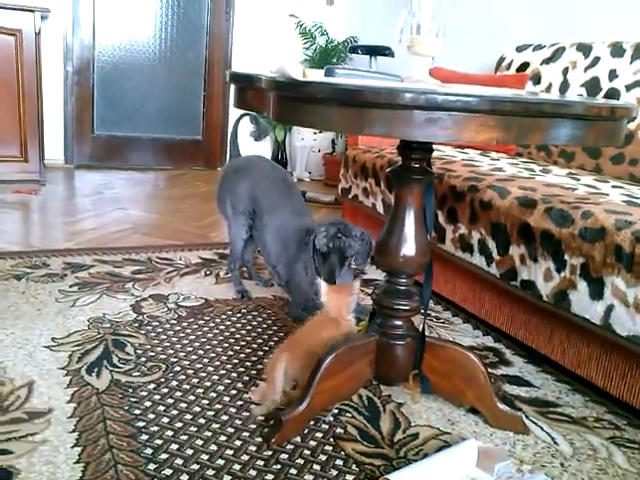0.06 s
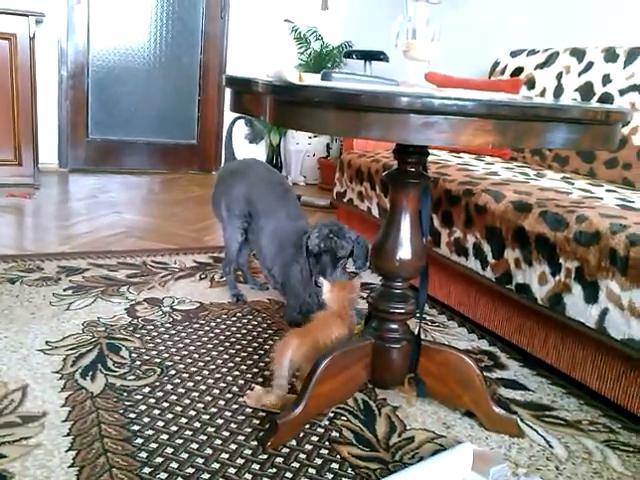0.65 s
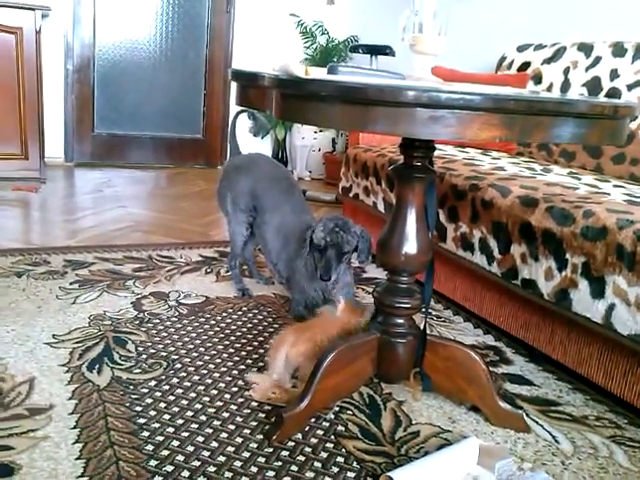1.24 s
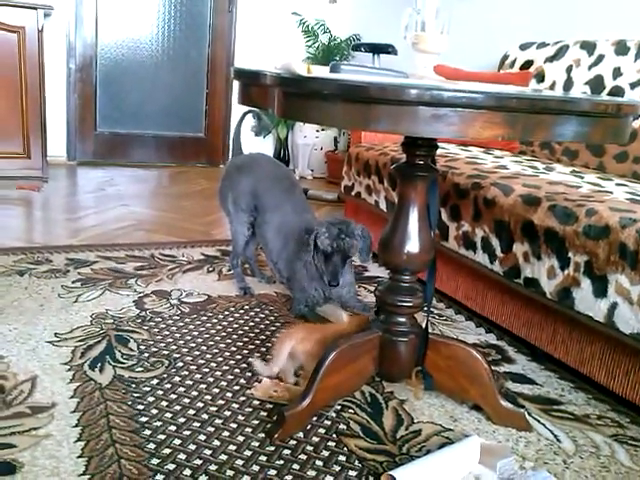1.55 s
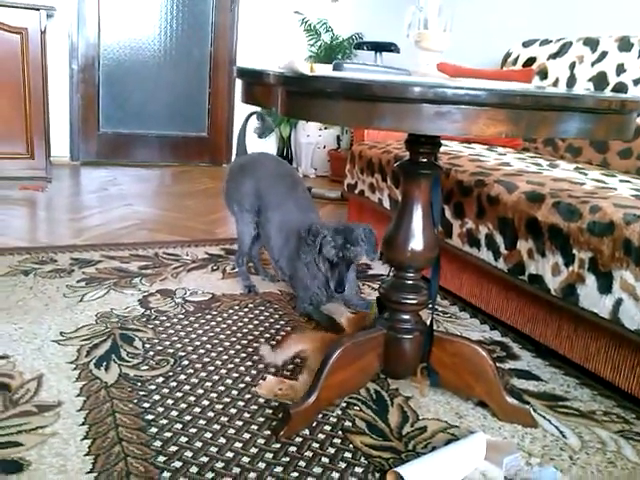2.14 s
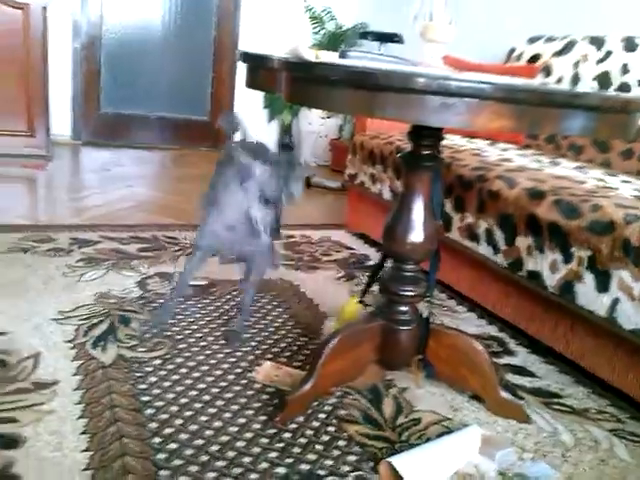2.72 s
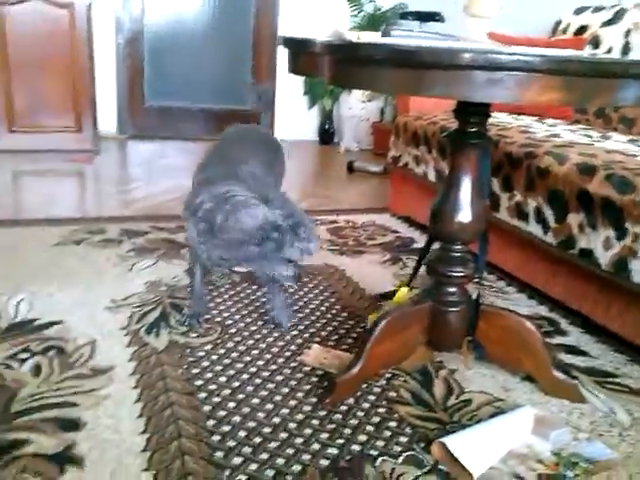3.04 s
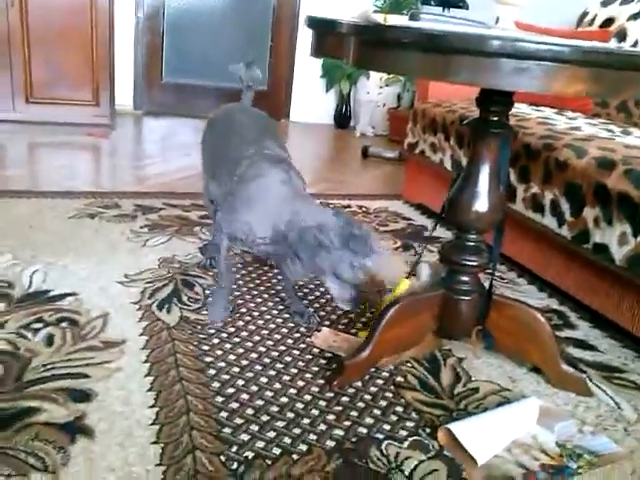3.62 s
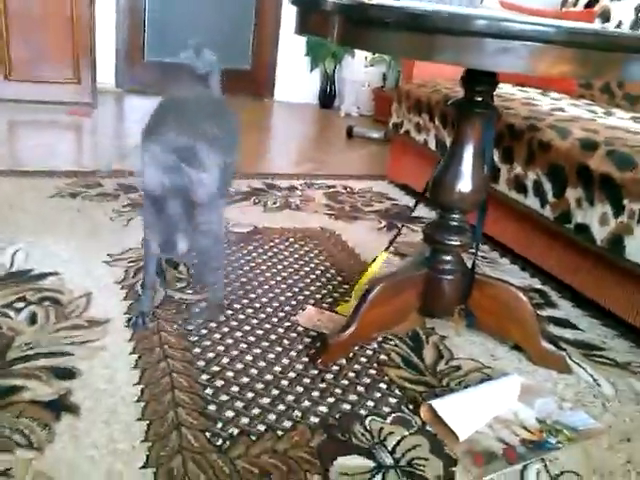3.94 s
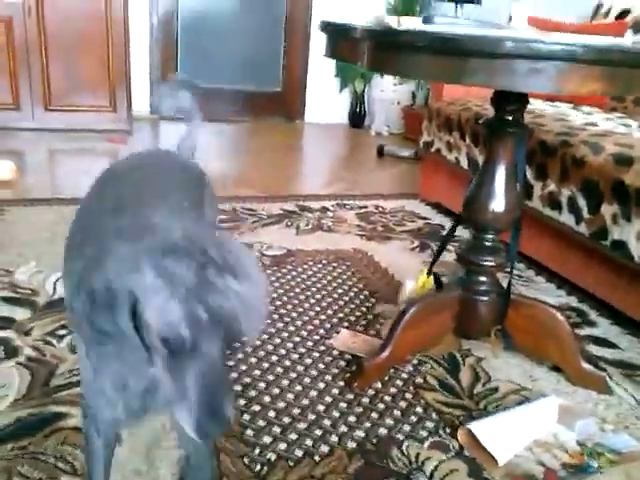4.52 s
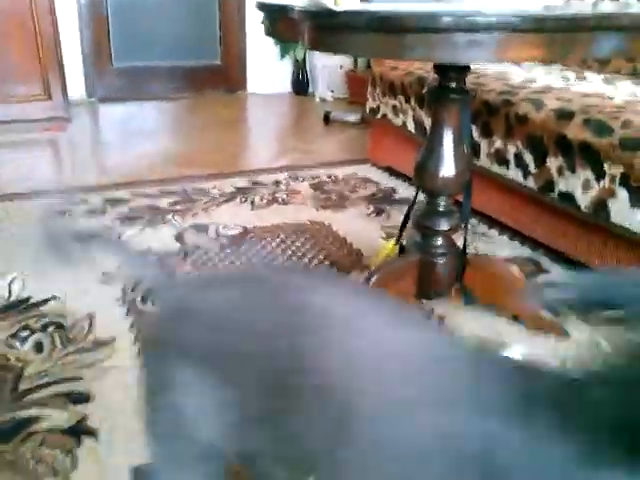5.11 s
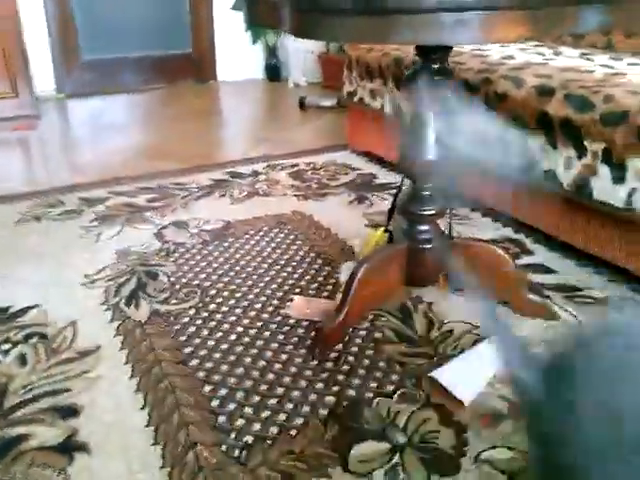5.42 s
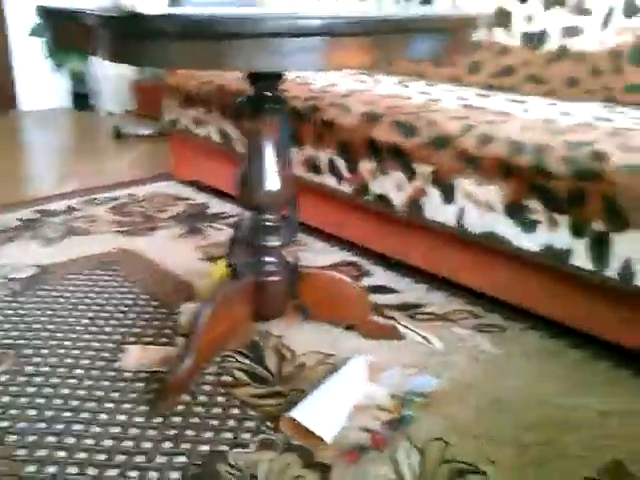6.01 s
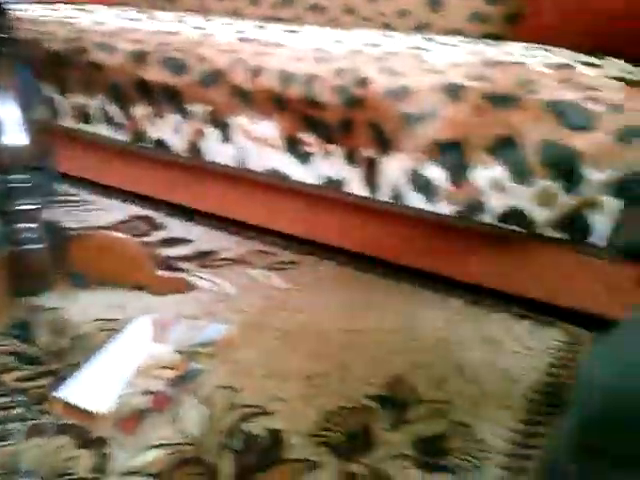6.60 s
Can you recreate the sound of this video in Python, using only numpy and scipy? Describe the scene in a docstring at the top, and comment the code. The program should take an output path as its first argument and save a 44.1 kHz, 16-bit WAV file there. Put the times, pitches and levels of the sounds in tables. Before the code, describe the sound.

For the first two seconds there is only quiet room noise, with a few faint ticks and slight stirrings of air, while a dog and a kitten tussle almost silently on a rug. From about 2.2 seconds, scratchy, hissing strokes build, like fingers shifting on a phone right by the microphone. Around 2.8 seconds a short cluster of low air thumps hits the microphone as the dog jumps back. The hiss is strongest near 3.3 seconds, followed by a sharp click. Soft, dull paw steps come now and then until about 5.6 seconds. More scratches and ticks fall around 4 seconds, with a quick group of soft knocks and clicks at 4.4. After 4.5 seconds the hiss dulls to a rustling scrape. Short scuffs come from 5 seconds on, with another click and knock near 6.3, then the rubbing fades. Everything is close and dry.

```python
"""A dog and a kitten tussle almost silently on a rug in a quiet room, close to a hand-held phone.
At first there is only room noise, with faint ticks and stirrings of air. After two seconds come scratchy
strokes, probably fingers shifting on the case, that hiss in the microphone port. Near three seconds air
thumps on the microphone as the dog jumps back. Then paws pad about, sharp ticks and soft knocks fall
between the strokes, the hiss dulls as the phone swings round, and a few short scuffs come last."""
import sys
import numpy as np
from scipy import signal
from scipy.fft import rfft, irfft, next_fast_len
from scipy.io import wavfile
from scipy.ndimage import uniform_filter1d, map_coordinates

SR = 44100
rng = np.random.default_rng(int(sys.argv[2]) if len(sys.argv) > 2 else 0)


def wav_out(sig):
    """Save sig, one row per channel (or a flat mono array), as 16-bit PCM at SR to the path in sys.argv[1]."""
    wavfile.write(sys.argv[1], SR, np.round(np.clip(np.atleast_2d(sig).T, -1, 1) * 32767).astype(np.int16))


N = 298116
T = np.arange(N) / SR


def amp(db):
    """Amplitude ratio of a level in decibels."""
    return 10 ** (np.asarray(db) / 20)


def unit(x):
    """Normalisation to rms 1."""
    return x / np.sqrt(np.mean(x ** 2) + 1e-20)


def wobble(knots_per_s):
    """Slow random modulation: a spline through Gaussian values."""
    return map_coordinates(rng.standard_normal(int(N * knots_per_s / SR) + 4), [T * knots_per_s])


def filtered(x, response):
    """Linear filtering: the spectrum of x times a frequency response."""
    size = next_fast_len(len(x) + 8192)
    return irfft(rfft(x, size) * response(np.fft.rfftfreq(size, 1 / SR)), size)[:len(x)]


def coloured(x, spectrum):
    """Spectral shaping by (frequency_hz, gain_db) points, at rms 1."""
    points_hz, gain_db = np.transpose(spectrum)
    return unit(filtered(x, lambda f: amp(np.interp(np.log(f + 1), np.log(points_hz), gain_db))))


def resonance(f, centre_hz, width_hz):
    """Frequency response of a damped oscillator."""
    return 1j * f * width_hz / (centre_hz ** 2 - f ** 2 + 1j * f * width_hz)


def noise_band(centre_hz, width_hz, stages=2, samples=N):
    """Random excitation of equal resonators in series, at rms 1."""
    noise = rng.standard_normal(samples)
    return unit(filtered(noise, lambda f: resonance(f, centre_hz, width_hz) ** stages))


def swell(full_s, rise_s, hold_s, fall_s):
    """Near-exponential growth and decay about a plateau that begins at full_s."""
    depth_db = 18.5  # one rise time before the plateau, or one fall time after it
    before = np.maximum(full_s - T, 0) / rise_s
    after = np.maximum(T - full_s - hold_s, 0) / fall_s
    return np.where(before + after < 4, amp(-depth_db * (before ** 0.94 + after ** 0.93)), 0)


def add(track, start_s, sound):
    """Superposition of a sound on the track."""
    i = max(round(start_s * SR), 0)
    track[i:i + len(sound)] += sound[:N - i]


def room():
    """Broadband noise with resonant bands: a low drone, port hiss and a midrange that fades in."""
    # spectrum of the quiet room: frequency_hz, gain_db
    ambient = [(20, -3.5), (76, -11.5), (140, -11.5), (200, -5.5), (290, 0), (450, -6), (750, -9.5),
               (1400, -13.5), (2200, -20), (2900, -26), (5000, -29), (7500, -28), (12500, -30.5),
               (16000, -28.5)]
    wash = amp(-53.5 + 1.28 * wobble(4.816)) * coloured(rng.standard_normal(N), ambient)
    drone = amp(-62.5) * noise_band(centre_hz=283.5, width_hz=66)
    port = amp(-66.5) * noise_band(centre_hz=9020, width_hz=1200)
    midrange_db = np.interp(T, [2.2, 3.6], [-80, -63])
    midrange = amp(midrange_db) * noise_band(centre_hz=1870, width_hz=1200, stages=3)
    return wash + drone + port + midrange


def air():
    """Turbulence rumbles on the port; each puff is a pressure peak between two shallow troughs."""
    # gusts of stirred air: full_s, rise_s, hold_s, fall_s, level_db
    gusts = [(0.198, .2, 0.55, 0.64, -59), (1.023, 0.044, 0.26, 0.7, -62.5),
             (2.258, 0.09, 0.043, 0.16, -47), (2.47, 0.052, 0.24, .1, -45),
             (2.803, 0.068, 0.13, 0.05, -38.5), (3.033, .03, .12, 0.61, -53)]
    # spectrum of the turbulence: frequency_hz, gain_db
    rumble = [(15, 6), (30, 1.5), (50, 1.5), (105, 1.5), (185, -9.5), (300, -17.5), (600, -73), (1500, -85)]
    # puffs on the port: peak_s, peak_db, pitch_hz
    puffs = [(0.595, -39, 80), (1.036, -51, 70), (1.23, -50, 70), (2.268, -51, 93.4), (2.701, -35.5, 69.4),
             (2.801, -28, 104), (2.812, -20.5, 125), (2.843, -21.5, 75), (2.87, -30.5, 173),
             (2.908, -26.5, 90), (2.924, -23.5, 86), (3.051, -30, 73.6), (3.162, -37, 110)]
    strength = sum(amp(level_db) * swell(*timing) for *timing, level_db in gusts)
    flutter = amp(5.5 * wobble(knots_per_s=14))
    out = strength * flutter * coloured(rng.standard_normal(N), rumble)
    for peak_s, peak_db, pitch_hz in puffs:
        phase = 2 * np.pi * pitch_hz * (T - peak_s)
        out += amp(peak_db) * (1 - phase ** 2 / 2) / (1 + phase ** 2 / 2) ** 2
    return out


def ticks():
    """Impulse response: a snap briefly excites high modes and a body mode, then trails off in crackle."""
    # sharp snaps, levels relative: start_s, level_db, ring_hz, body_hz, body_db, crackle_db
    snaps = [ (0.104, -39, 12900, 4500, -6, -1), (0.446, -43.5, 12500, 4540, -2.5, -3),
             (0.7966, -33.5, 7150, 3300, -20, -17), (2.026, -26.5, 11900, 5600, -9, -20),
             (2.1525, -26, 11600, 5240, -10, -13), (2.2334, -39.5, 12000, 3300, -13, -13),
             (3.3664, -9, 8800, 3300, -30, -36), (3.6542, -35.5, 9290, 3500, -13, -7),
             (3.903, -30.5, 8810, 3500, -11, -9), (3.9802, -16, 10000, 3550, -21, 5),
             (4.1296, -33.5, 9010, 3500, -12, -2), (4.3793, -18, 8900, 2500, -15.5, -22),
             (4.3872, -29, 10500, 2000, -2, -14), (4.4092, -22, 8500, 2500, -14, -3),
             (4.58, -22.5, 7700, 6840, -32, -34), (4.5898, -16, 7000, 1860, -18, -24),
             (4.602, -40, 7500, 3000, -5, -9), (4.6322, -24.5, 9600, 6500, -15, 8),
             (5.1388, -29.5, 8900, 3040, 7, -18), (5.285, -51, 8970, 2860, 8.5, -15),
             (5.3613, -29, 8800, 4000, -15, -30), (5.5831, -30.5, 8710, 3600, 0.5, -3),
             (5.9604, -25.5, 9400, 4020, -2.5, 5), (6.0714, -21, 10200, 3240, -5, 3),
             (6.2636, -12, 9400, 3000, -13, -12), (6.4497, -41, 9220, 2840, 5, 8), ]
    # faint ticks of one timbre at random moments while the grip shifts; same columns
    strays = [(rng.uniform(3.7, 6.4), rng.uniform(-48, -42), 9000, 3500, -5, -12) for _ in range(24)]
    out, t = np.zeros(N), np.arange(4096) / SR
    for start_s, level_db, ring_hz, body_hz, body_db, crackle_db in snaps + strays:
        decay = amp(-60 * t / 0.0083) + amp(-24 - 60 * t / 0.21)  # a fast burst and a faint tail
        snap = (t == 0) + amp(crackle_db) * decay * rng.standard_normal(len(t))

        def ring_response(f):
            """Two modes in parallel, band-limited on both sides."""
            modes = resonance(f, ring_hz, 1500) + 1.5 * resonance(f, 9050, 780)
            highpass = (1j * f / (4600 + 1j * f)) ** 2
            return modes * highpass / (1 + (f / (1.68 * ring_hz)) ** 10)

        ring = unit(filtered(snap, ring_response))
        body = unit(filtered(snap, lambda f: -resonance(f, body_hz, 1700) * resonance(f, 2000, 6000)))
        add(out, start_s, amp(level_db - 26) * ring + amp(level_db + body_db - 24) * body)
    return out


def wandering_contact(x, depth_db):
    """Mode excitation depends on position: as the contact wanders, resonances come and go."""
    spectrogram = signal.stft(x, nperseg=512)[2]
    patches = uniform_filter1d(rng.standard_normal(spectrogram.shape), 6, axis=0)  # across frequency
    patches = uniform_filter1d(patches, 12, axis=1)  # across time
    return signal.istft(spectrogram * amp(depth_db * unit(patches)), nperseg=512)[1][:N]


def friction(spectrum, slips_per_s, grain_db, flutter_db):
    """Stick-slip friction: tiny uneven slips on a bed of noise, with a fluttering contact; rms 1."""
    slips = (rng.random(N) < slips_per_s / SR) * rng.standard_normal(N)
    grains = rng.standard_normal(N) + amp(grain_db) * unit(slips)
    grains *= amp(flutter_db * wobble(knots_per_s=130))
    return coloured(wandering_contact(grains, depth_db=1.17), spectrum)


def strokes():
    """Sliding friction on the case: light contact hisses near the port's resonance, firm contact scrapes."""
    # slides over the case: full_s, rise_s, hold_s, fall_s, level_db, pressure (0 to 1)
    slides = [ (0.799, 0.0026, 0.0041, 0.0058, -52, 0.75), (1.379, 0.014, 0.015, .04, -57, 0.8),
              (2.231, .002, 0.01, 0.039, -56, 0.65), (2.407, 0.1, 0.045, 0.032, -50.5, 0.09),
              (2.582, 0.33, 0.073, 0.23, -44.5, 0.73), (2.829, 0.11, 0.05, 0.026, -42, 0.09),
              (3.0, 0.053, 0.023, 0.028, -42, 0.12), (3.06, 0.024, 0.0093, 0.012, -47.5, 0.22),
              (3.197, 0.11, 0.061, 0.049, -38, 0), (3.281, 0.08, 0.025, 0.016, -28, 0.36),
              (3.395, 0.013, 0.054, 0.13, -33, 0.52), (3.49, 0.056, 0.15, 0.006, -42, 0.56),
              (3.668, 0.022, 0.016, 0.21, -51, 0.82), (3.812, 0.021, 0.029, 0.037, -35, 0.6),
              (3.905, 0.0033, 0.0053, 0.0053, -41.5, 0.7), (3.933, .01, 0.046, 0.022, -55.5, 0.91),
              (3.98, .002, 0.022, 0.078, -31.5, 0.46), (4.203, 0.08, .03, .05, -45.5, 0.78),
              (4.255, 0.05, 0.028, 0.041, -33.5, 0.53), (4.406, 0.022, .04, 0.41, -58, 0.77),
              (4.73, .005, 0.0089, 0.15, -57, 0.87), (4.991, 0.17, 0.047, 0.26, -44.5, 0.93),
              (5.043, 0.0081, 0.0052, 0.019, -35.5, 0.7), (5.162, .02, 0.026, 0.081, -53, 0.84),
              (5.37, 0.12, 0.022, 0.062, -44.5, 0.81), (5.437, .012, .01, 0.1, -46.5, 0.64),
              (5.541, 0.014, 0.016, 0.032, -40, 0.82), (5.58, 0.0054, 0.032, 0.34, -43.5, 1),
              (5.775, .12, 0.14, 0.24, -49.5, 0.91), (6.073, 0.0045, 0.017, 0.089, -40.5, 0.66),
              (6.13, 0.12, 0.12, .1, -48, 1), (6.262, .06, 0.009, 0.041, -32.5, 0.84),
              (6.284, .03, .01, 0.15, -38, 0.78), (6.58, 0.029, 0.026, 0.64, -53, 0.83), ]
    # spectra of the four kinds of contact: frequency_hz, gain_db
    hiss_spectrum = [(1500, -60), (3000, -24), (4800, -20.5), (5800, -13.5), (6700, -7.5), (7900, -8),
                     (8700, -4), (9300, 3), (10200, -6.5), (11500, -12.5), (16000, -44)]
    rustle_spectrum = [(1500, -24), (3200, -36.5), (4400, -23.5), (5400, -33.5), (6500, -5.5), (7600, 0),
                       (8500, 3.5), (9300, 6.5), (10200, -2), (12000, -14), (16000, -52)]
    skim_spectrum = [(5000, -23), (6500, -14.5), (8500, -9), (10300, -1), (11500, 3.5), (13200, 0.5),
                     (14500, -1.5), (16000, -10)]
    scrape_spectrum = [(100, -2.5), (300, -9.5), (600, -0.5), (1300, -2), (2300, -1), (3300, -1),
                       (4500, -0.5), (5300, -6.5), (7500, -11.5)]
    swing_s = 4.5  # the phone swings round and the hiss becomes a duller rustle
    power = np.zeros((3, N))
    for *timing, level_db, pressure in slides:
        skim_db, scrape_db = 8 - 27.5 * pressure, -27.5 + 28.5 * pressure
        mix = amp([[0], [skim_db], [scrape_db]])
        power += (amp(level_db) * mix * swell(*timing)) ** 2  # incoherent sources add in power
    uneven_speed = amp(-0.3 * wobble(knots_per_s=38))
    hiss_gain, skim_gain, scrape_gain = np.sqrt(power) * uneven_speed
    hiss = amp(1) * friction(hiss_spectrum, slips_per_s=1900, grain_db=-1.5, flutter_db=1.7)
    rustle = friction(rustle_spectrum, slips_per_s=1500, grain_db=-4, flutter_db=1.5)
    skim = amp(-0.8) * friction(skim_spectrum, slips_per_s=2800, grain_db=-7, flutter_db=1)
    scrape = amp(-1.25) * friction(scrape_spectrum, slips_per_s=300, grain_db=-5.5, flutter_db=-1.4)
    return hiss_gain * np.where(T < swing_s, hiss, rustle) + skim_gain * skim + scrape_gain * scrape


def knocks():
    """Heavily damped oscillation: a soft contact pushes the case out and back for about one cycle."""
    # soft impacts on the case: start_s, peak_db, nominal_pitch_hz
    impacts = [(2.1543, -34.5, 1500), (3.654, -34.5, 460), (3.904, -32.5, 450), (4.3801, -21, 490),
               (4.387, -24, 430), (4.4103, -25, 460), (6.2639, -23.5, 348), (6.2667, -28, 380)]
    out, t = np.zeros(N), np.arange(2048) / SR
    for start_s, peak_db, nominal_pitch_hz in impacts:
        cycles = nominal_pitch_hz * t
        phase = 2 * np.pi * 1.28 * np.log1p(cycles / 0.97)  # the swing slows as the contact yields
        push = np.sin(phase) * cycles * np.exp(-cycles / 0.3)
        add(out, start_s, amp(peak_db) * push / np.abs(push).max())
    return signal.sosfilt(signal.butter(2, 70, "highpass", fs=SR, output="sos"), out)


def paws():
    """Friction between soft surfaces is mostly low in frequency: pads patter dully on the rug."""
    # footfalls: full_s, rise_s, hold_s, fall_s, level_db
    steps = [(2.793, 0.037, 0.088, .04, -47.5), (3.975, 0.049, 0.029, 0.053, -46),
             (4.113, 0.028, 0.052, 0.088, -51.5), (4.55, 0.0087, 0.0071, .05, -48.5),
             (5.149, .02, 0.058, 0.083, -54.5), (5.541, .05, 0.021, 0.083, -48.5)]
    # spectrum of a pad on the rug: frequency_hz, gain_db
    pad_spectrum = [(50, -22), (110, -3), (170, 0), (260, -3), (500, -15), (900, -33), (2000, -55)]
    strength = sum(amp(level_db) * swell(*timing) for *timing, level_db in steps)
    return strength * friction(pad_spectrum, slips_per_s=90, grain_db=-9, flutter_db=-0.5)


def scuffs():
    """Forced vibration: brief slides ring the modes of the case, each with its own brightness."""
    # brief slides: middle_s, level_db, length_s, tilt_db_per_octave
    slides = [(5.027, -40, 0.011, -1.5), (5.047, -42.5, 0.034, 4.5), (5.152, -47.5, 0.067, -2.5),
              (5.62, -50.5, 0.14, 9), (6.09, -40.5, 0.025, -6), (6.267, -50, .012, 2),
              (6.482, -51, 0.072, 4.5)]
    # modes of the case: centre_hz, width_hz, gain_db
    modes = [(517, 203, -1.5), (1180, 620, -2.5), (1560, 2100, 1.5), (3000, 830, -12.5)]
    out, t = np.zeros(N), np.arange(-SR // 8, SR // 8) / SR
    for middle_s, level_db, length_s, tilt_db_per_octave in slides:
        ring = np.zeros(len(t))
        for centre_hz, width_hz, gain_db in modes:
            gain = amp(gain_db + tilt_db_per_octave * np.log2(centre_hz))
            ring += gain * noise_band(centre_hz, width_hz, samples=len(t))
        envelope = np.exp(-2 * (t / length_s) ** 2)
        add(out, middle_s + t[0], amp(level_db) * envelope * unit(ring))
    return out


def scene():
    """Superposition of direct sound in one channel: everything is close and dry."""
    return (room() + air() + ticks() + strokes() + knocks() + paws() + scuffs())[None]


def record(dry):
    """Band limiting: the phone acts as a steep low-pass filter."""
    cutoff_hz = 15900
    return np.array([filtered(x, lambda f: 1 / (1 + (f / cutoff_hz) ** 200)) for x in dry])


dry = scene()
out = record(dry)
wav_out(out)
```